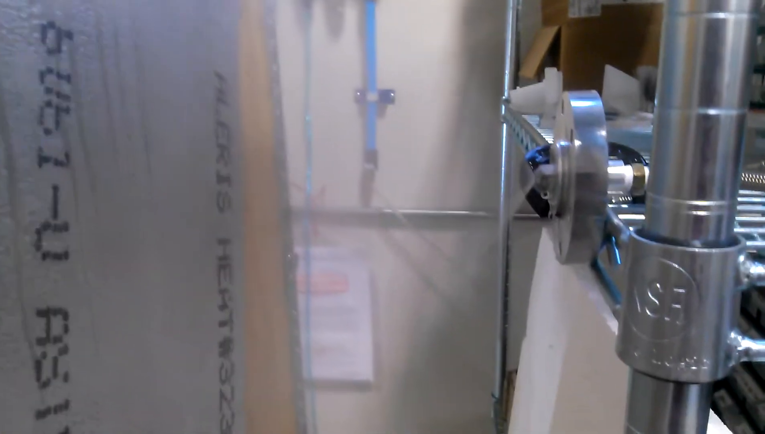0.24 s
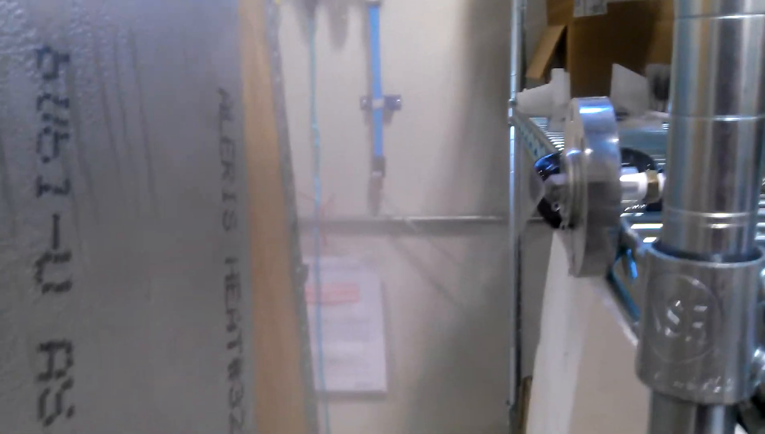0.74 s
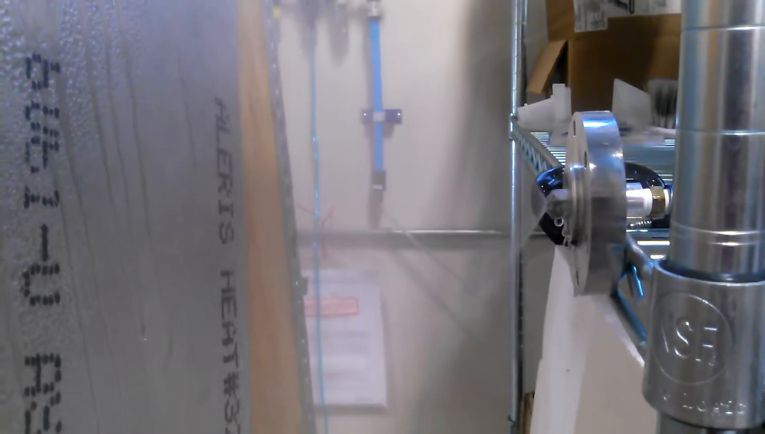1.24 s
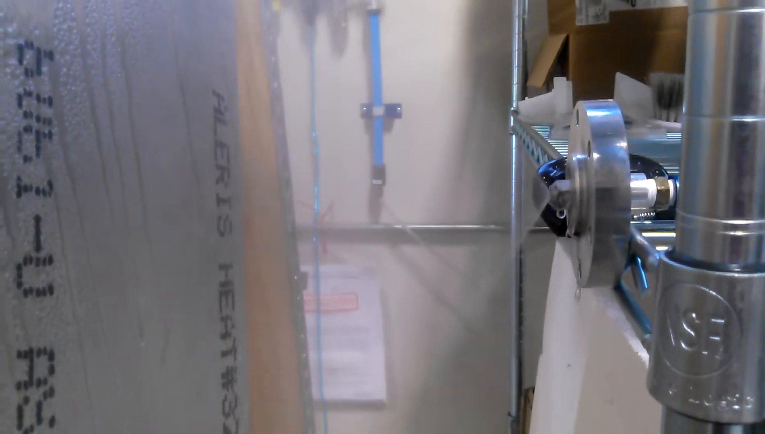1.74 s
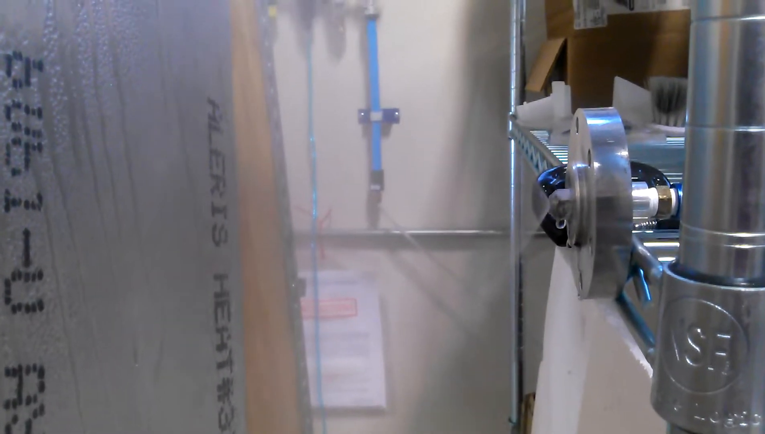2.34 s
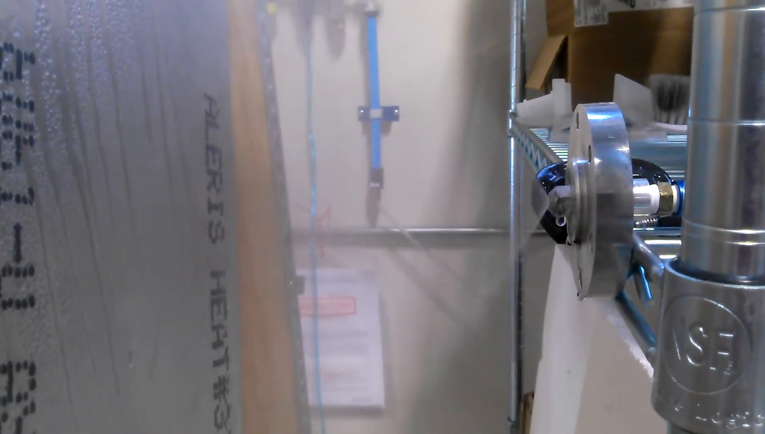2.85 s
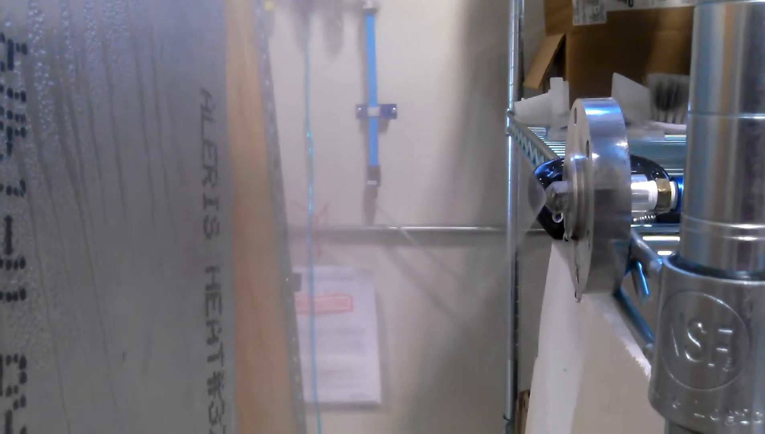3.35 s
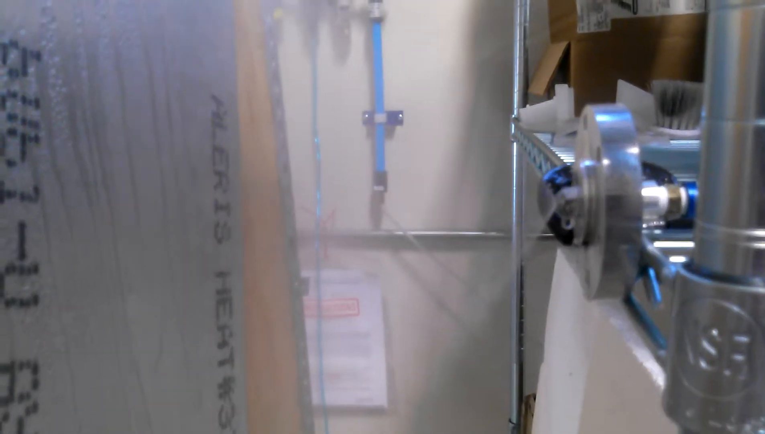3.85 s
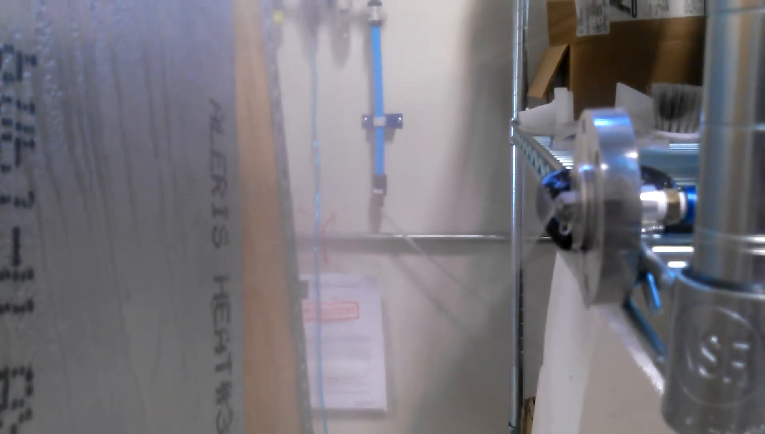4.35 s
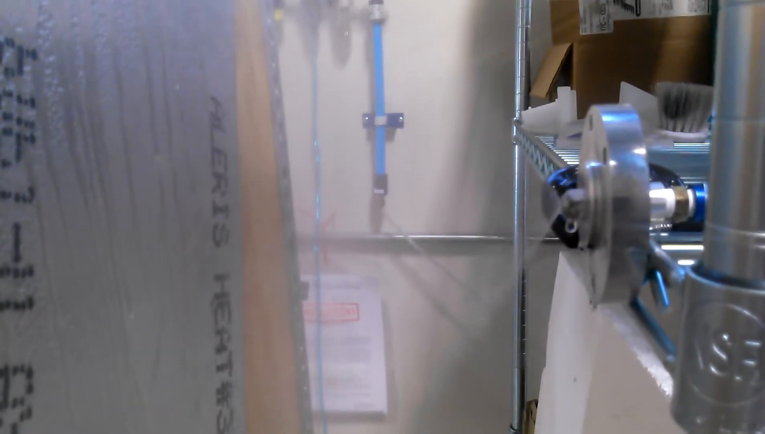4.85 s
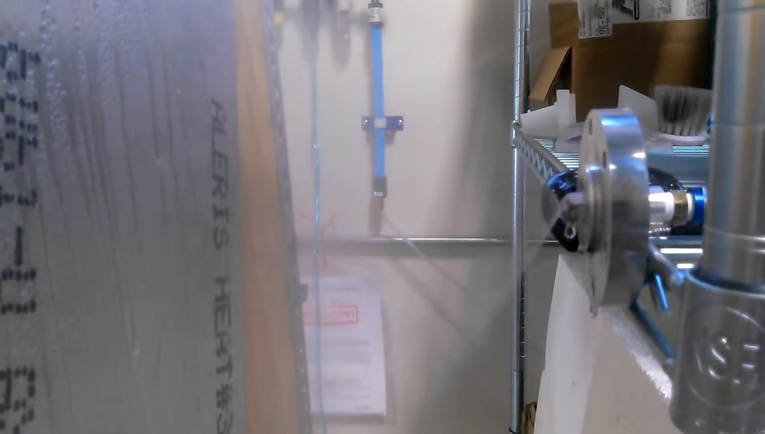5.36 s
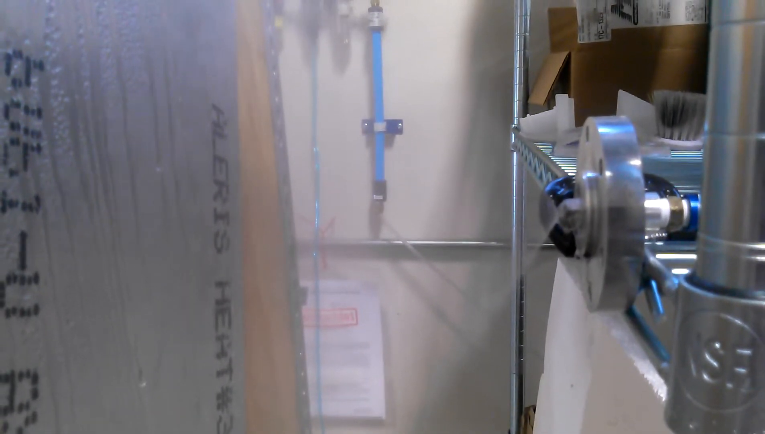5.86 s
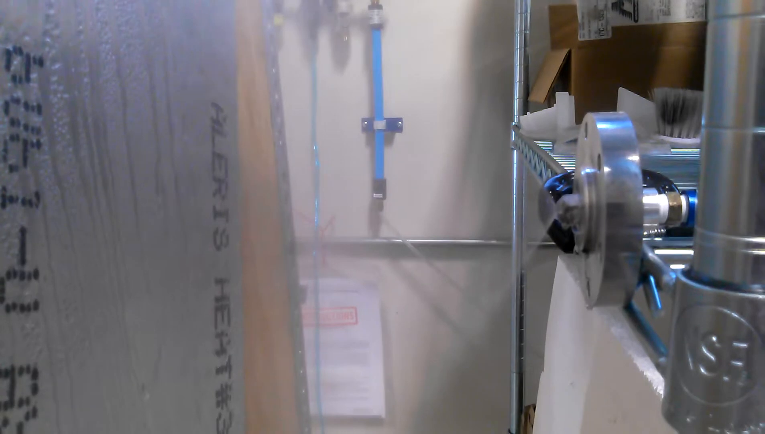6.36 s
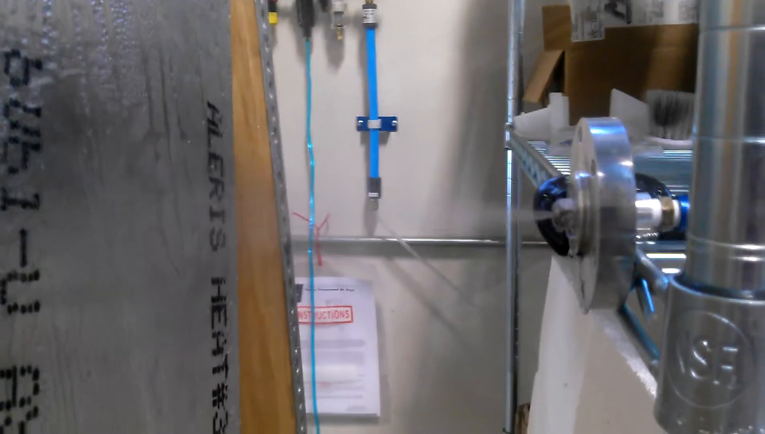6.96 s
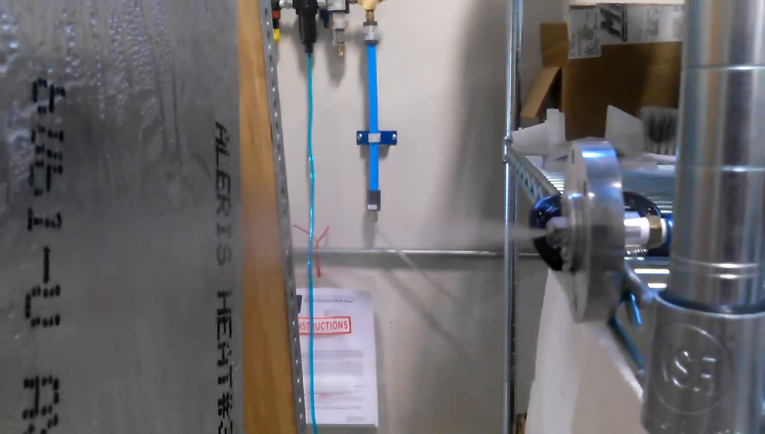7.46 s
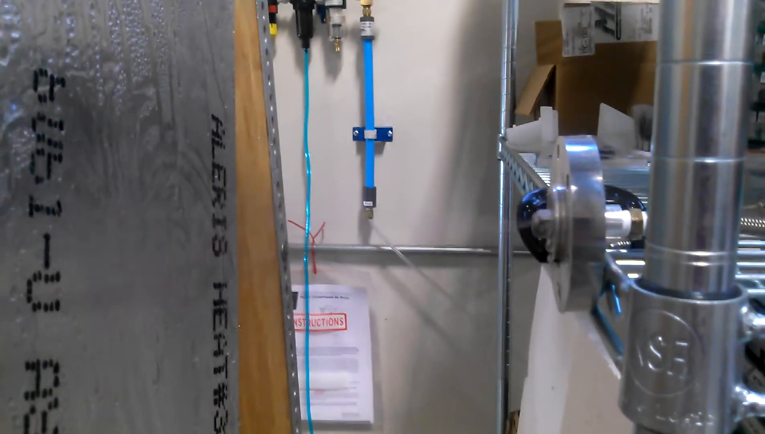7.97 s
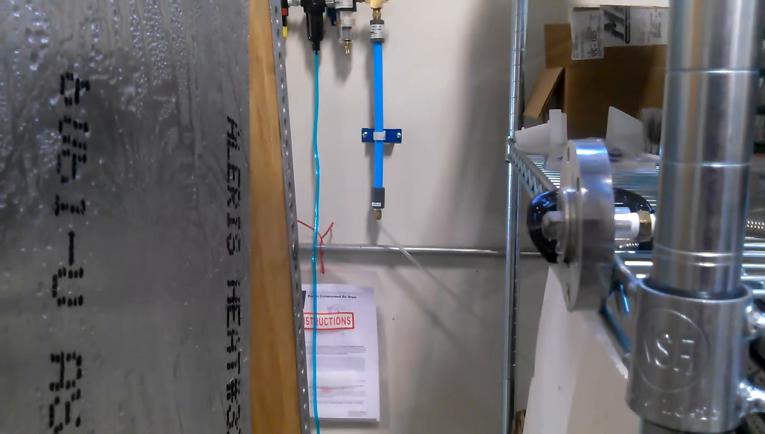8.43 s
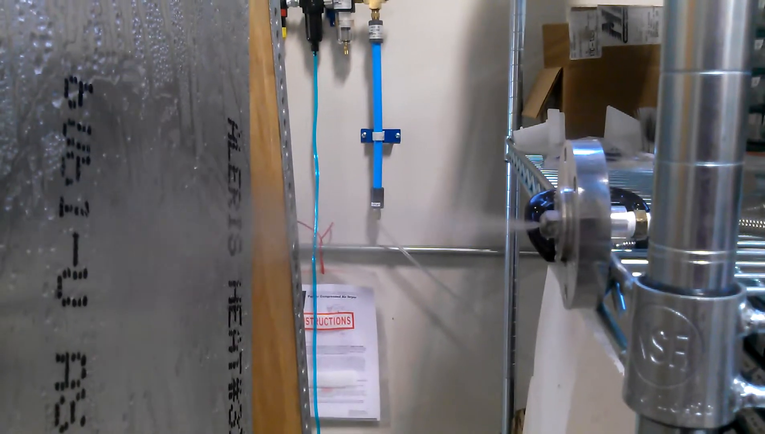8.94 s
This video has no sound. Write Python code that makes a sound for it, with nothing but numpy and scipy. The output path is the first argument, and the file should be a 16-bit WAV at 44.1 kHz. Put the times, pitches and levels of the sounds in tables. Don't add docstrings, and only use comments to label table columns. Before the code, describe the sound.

A small workshop heard through one close microphone, identical in both channels and a little dull at the very top. From 0 s a quiet, fine mist hisses at a metal nozzle, concentrated high up, slowly strengthening as nearby metal shimmers along. Beneath lie soft ventilation noise, low rumble, and transformer hum and fan drone that swell irregularly. Small dull, hollow taps come at about 0.2 s, the loudest immediately after, then at 0.3 and 0.45 s; fainter ones follow near 1.0, 1.2, 1.6 and 2.0 s. Only hiss and hum continue until about 6.25 s, when a valve opens in milliseconds and a massive jet roars, shrill tearing at the orifice mixed with full splashing on the plate. It overshoots slightly, then holds, with subtle gain dips near 6.5, 7.2 and 7.8 s, each creeping back. At 8.5 s a tick cuts everything to complete silence.

```python
import sys
import numpy as np
from scipy import signal
from scipy.fft import rfft, irfft, next_fast_len
from scipy.io import wavfile
from scipy.ndimage import uniform_filter1d, minimum_filter1d, map_coordinates

SR = 44100
rng = np.random.default_rng(int(sys.argv[2]) if len(sys.argv) > 2 else 0)


def int16_out(signal):
    q = np.round(np.clip(np.atleast_2d(signal).T, -1, 1) * 32767)
    wavfile.write(sys.argv[1], SR, q.astype(np.int16))


def gain_from_decibels(decibels):
    exponent = np.asarray(decibels, float) / 20
    return 10 ** exponent


N = 405719


def unit(x):
    return x / np.sqrt(np.mean(x ** 2) + 1e-20)


def along(points, hz):
    point_hz, db = np.transpose(points)
    return gain_from_decibels(np.interp(np.log(hz + 1), np.log(point_hz + 1), db))


def rings(modes, hz):
    power = 0
    for center_hz, width_hz, db in modes:
        detune = 2 * (hz - center_hz) / width_hz
        power = power + gain_from_decibels(2 * db) / (1 + detune ** 2) ** 2
    return np.sqrt(power)


def wobble(rate):
    knots = rng.standard_normal(int(N * rate / SR) + 4)
    return map_coordinates(knots, [np.arange(N) * rate / SR])


def rush(gain, patchy_db, spray_db=0):
    drops = rng.standard_normal(N) * gain_from_decibels(spray_db * wobble(900))
    spectrum = signal.stft(drops, nperseg=512)[2]
    patches = uniform_filter1d(rng.standard_normal(spectrum.shape), 6, 0)
    patches = unit(uniform_filter1d(patches, 12, 1))
    patchy = signal.istft(spectrum * gain_from_decibels(patchy_db * patches), nperseg=512)[1][:N]
    size = next_fast_len(N + 8192)
    colour = gain(np.fft.rfftfreq(size, 1 / SR))
    return unit(irfft(rfft(patchy, size) * colour, size)[:N])


# freq_hz, level_db (per Hz)
SPLASH_SPECTRUM = [(15, -15), (30, -3.5), (60, -6), (150, -2), (1000, -1.5), (3000, -1.5), (5000, -7),
                   (8000, -31.5), (9000, -120)]
# freq_hz, level_db (per Hz)
ORIFICE_SPECTRUM = [(1000, -120), (2000, -9.5), (4700, -0.5), (6460, 1.5), (6900, -2.5), (7200, -3),
                    (8050, -16), (8400, -120)]


def jet():
    jet_db, open_s, open_rise_s = -11.5, 6.2525, .0013
    spurt_db, settle_s = 1.5, .15
    lag_db, lag_s, pool_db_per_s = -2, 0.027, 0.37
    shrill_db, shrill_s, shrill_hz = -1, .3, (7500, 8600)
    t = np.arange(N) / SR
    since = np.clip(t - open_s, 0, None)
    opening = (t - open_s - .002) / open_rise_s * 2
    valve = 1 / (1 + np.exp(-np.clip(opening, -50, 50)))
    surge_db = .3 * wobble(40) + .15 * wobble(8)

    splash_db = lag_db * np.exp(-since / lag_s) + pool_db_per_s * since - 3.6
    splash = gain_from_decibels(splash_db) * rush(lambda hz: along(SPLASH_SPECTRUM, hz), patchy_db=0.42, spray_db=0.5)

    tear_db = spurt_db * np.exp(-since / settle_s) - 3.9
    tear = gain_from_decibels(tear_db) * rush(lambda hz: along(ORIFICE_SPECTRUM, hz), patchy_db=0.6, spray_db=1.04)
    shrill = signal.sosfilt(signal.butter(2, shrill_hz, "band", fs=SR, output="sos"), tear)
    tear = tear + gain_from_decibels(shrill_db) * np.exp(-since / shrill_s) * shrill
    return valve * gain_from_decibels(jet_db + surge_db) * (splash + tear)


# freq_hz, level_db (per Hz)
HISS_SPECTRUM = [(1500, -120), (2000, -26.5), (2450, -24), (2750, -13.5), (3900, -10.5), (5000, -7),
                 (5500, -1.5), (5950, -5), (6500, -1.5), (6800, -5), (7050, -12.5), (7350, -12.5),
                 (7600, -29.5), (8000, -120)]
# freq_hz, width_hz, level_db
METAL_MODES = [(2330, 110, -19), (3860, 220, -5), (4380, 90, -6), (4750, 120, -9.5), (5655, 160, -0.5),
               (6280, 140, -4.5)]
# freq_hz, level_db (per Hz)
FRINGE_SPECTRUM = [(7100, -120), (7400, -1), (7700, -2.5), (8000, -11), (8200, -120)]


def mist():
    mist_db, build_db_per_s = -35.5, 0.18
    metal_start_db, metal_grows_db_per_s = -11.5, 0.54
    fringe_end_db, narrow_db, widen_s = -22.5, -4.5, 1.2
    t = np.arange(N) / SR
    hiss_db = mist_db + build_db_per_s * t
    metal_db = metal_start_db + metal_grows_db_per_s * t
    fringe_db = fringe_end_db + narrow_db * np.exp(-t / widen_s)
    hiss = rush(lambda hz: along(HISS_SPECTRUM, hz), patchy_db=0.6, spray_db=0.5)
    metal = rush(lambda hz: rings(METAL_MODES, hz), patchy_db=0.0, spray_db=2.0)
    fringe = rush(lambda hz: along(FRINGE_SPECTRUM, hz), patchy_db=0.5, spray_db=2.5)
    spray = hiss + gain_from_decibels(metal_db) * metal + gain_from_decibels(fringe_db) * fringe
    return gain_from_decibels(hiss_db + 0.34 * wobble(7)) * spray


# start_s, peak_db, pitch_hz, click_db (re ring)
KNOCKS = [
    (.2222, -29, 740, -0.5),
    (0.2419, -20.5, 742, -4),
    (.3180, -35, 716, -0.5),
    (.4548, -35, 690, 5),
    (.974, -39, 942, 1),
    (1.168, -41, 578, -5),
    (1.556, -52, 1700, 15),
    (2.028, -42, 778, 0),
]
# pitch_ratio, level_db, t60_s
TAP_MODES = [(1.6, 2, 0.0073), (2.2, -3.5, 0.0088), (3.1, -6, .008), (4.2, -7, .006)]


def knocks():
    out, t = np.zeros(N), np.arange(SR // 10) / SR
    attack = (1 - np.exp(-t / 0.00015)) ** 2
    for start_s, peak_db, pitch_hz, click_db in KNOCKS:
        ring = gain_from_decibels(-60 * t / 0.025) * np.sin(2 * np.pi * pitch_hz * t * (1 - 8 * t))
        click = np.zeros(len(t))
        for ratio, level_db, t60_s in TAP_MODES:
            click += gain_from_decibels(level_db - 60 * t / t60_s) * np.sin(2 * np.pi * ratio * pitch_hz * t)
        tap = gain_from_decibels(peak_db + 3.5) * (ring + gain_from_decibels(click_db) * click) * attack
        out[round(start_s * SR):][:len(t)] -= tap
    return out


def drone(hz, drift_hz):
    phase = 2 * np.pi * np.cumsum(hz + drift_hz * wobble(9)) / SR
    return np.sqrt(2) * np.sin(phase)


def swells(rows):
    t = np.arange(0, N + 256, 256) / SR
    rise_db = sum(db * np.exp(-np.abs((t - s) / half) ** 3) for s, db, half in rows)
    return np.interp(np.arange(N) / SR, t, rise_db)


# center_s, rise_db, half_length_s
HUM_SWELLS = [(.14, 7, .07), (.42, 7, .06), (.9, 7, 0.15), (1.25, 11, 0.085), (1.75, 10, 0.16),
              (2.2, 6, 0.22), (2.7, 9.5, 0.13), (3.0, 7.5, 0.13), (3.5, 8, 0.37), (4.05, 4, 0.094),
              (4.65, 11.5, 0.42), (5.3, 7, .07), (5.72, 6, .12), (6.0, 4.5, 0.041)]
# center_s, rise_db, half_length_s
FAN_SWELLS = [(.0, 11, 0.11), (.44, 13, 0.16), (1.15, 6, .1), (2.0, 7, .15), (2.48, 12, 0.1),
              (2.92, 10, .07), (3.65, 9.5, .2), (4.3, 8.5, 0.16), (4.62, 10.5, 0.11), (4.95, 6, .1),
              (5.3, 9, .08), (6.04, 11, .07)]
# freq_hz, width_hz, level_db
ROOM_MODES = [(54, 10, -2.5), (75, 8, -9.5), (94, 9, 0), (113, 13, -3.5), (137, 27, -2), (185.3, 8, 0.5),
              (211.2, 8, -5.5), (233.7, 12, -10.5), (274, 5.8, -6), (572.5, 27, -15.5), (888, 25, -15),
              (952, 34, -16.5)]
# freq_hz, level_db (per Hz)
AIR_SPECTRUM = [(25, -38), (45, 4.5), (200, 0.5), (300, -4), (700, -6), (900, -5.5), (1150, -9.5),
                (1400, -5.5), (1600, -7.5), (2200, -4.5), (2500, -21.5), (2900, -120)]


def workshop():
    flutter_db = 1.2
    hum_db = -50.5 + swells(HUM_SWELLS) + flutter_db * wobble(11)
    fan_db = -55.0 + swells(FAN_SWELLS) + flutter_db * wobble(11)
    hum = gain_from_decibels(hum_db) * drone(hz=119.2, drift_hz=.8)
    fan = gain_from_decibels(fan_db) * drone(hz=167.0, drift_hz=2.5)
    rumble = rush(lambda hz: rings(ROOM_MODES, hz), patchy_db=1)
    air = rush(lambda hz: along(AIR_SPECTRUM, hz), patchy_db=1.0)
    rumble_db = -45.0 + .6 * wobble(3.5)
    air_db = -46.5 + 0.54 * wobble(3.3)
    return hum + fan + gain_from_decibels(rumble_db) * rumble + gain_from_decibels(air_db) * air


def scene():
    return np.tile(mist() + workshop() + knocks() + jet(), (2, 1))


# freq_hz, level_db
IMAGE_LEAK = [(8000, 0), (8400, -5.5), (8700, -9.5), (9000, -16), (9500, -25), (10000, -40), (10250, -58),
              (10400, -120)]


def converter(x):
    size, fold = 10 * SR, 10 * 8000
    spectrum = rfft(x, size)
    leak = along(IMAGE_LEAK, np.arange(fold, 2 * fold) / 10)
    spectrum[fold:2 * fold] = np.conj(spectrum[fold:0:-1]) * leak
    spectrum[2 * fold:] = 0
    return irfft(spectrum, size)[:N]


def limiter(x):
    gain = np.minimum(1, .95 / (np.abs(x) + 1e-9))
    gain = minimum_filter1d(gain, size=161)
    return uniform_filter1d(uniform_filter1d(gain, size=80), size=80)


def top_cut(x):
    return signal.sosfilt(signal.butter(12, 15720, fs=SR, output="sos"), x)


# start_s, gain_cut_db, tick_db
OVERLOADS = [
    (6.275, 0, -45.5),
    (6.4, -0.16, -42),
    (6.485, 0.6, -42),
    (7.165, 1.46, -38.5),
    (7.765, 1.5, -40.5),
    (8.4871, 1.5, -22),
]


def record(dry):
    end_s, recover_s = 8.4876, 0.73
    fizz_db, fizz_half_s = -30, .018
    t, cut_db, ticks = np.arange(N) / SR, np.zeros(N), np.zeros(N)
    sounding = t < end_s
    fizz = rng.standard_normal(N)
    for start_s, db, tick_db in OVERLOADS:
        after = np.clip(t - start_s, 0, None)
        cut_db += db * (1 - np.exp(-after / .004)) * np.clip(1 - after / recover_s, 0, 1)
        ticks[round(start_s * SR):][:3] = gain_from_decibels(tick_db + 4) * np.array([1, 1.4, .5])
        smear = np.clip(1 - ((t - start_s) / fizz_half_s) ** 2, 0, 1)
        ticks += gain_from_decibels(min(tick_db, -38) + fizz_db) * smear * sounding * fizz
    x = np.tile(converter(dry[0]), (2, 1)) * gain_from_decibels(-cut_db)
    return top_cut(x * limiter(x[0]) * sounding + ticks)


dry = scene()
out = record(dry)
int16_out(out)
```